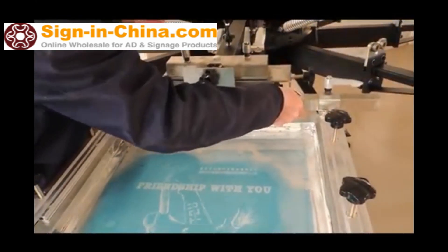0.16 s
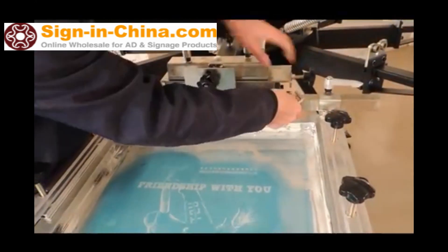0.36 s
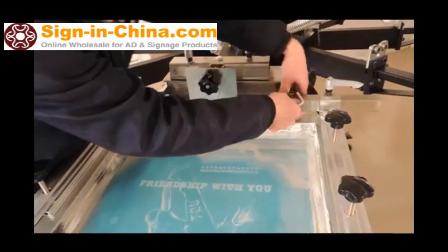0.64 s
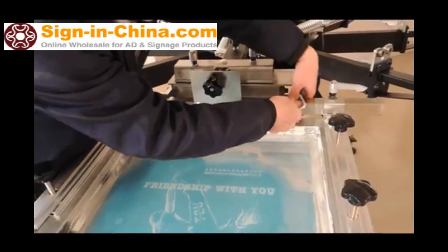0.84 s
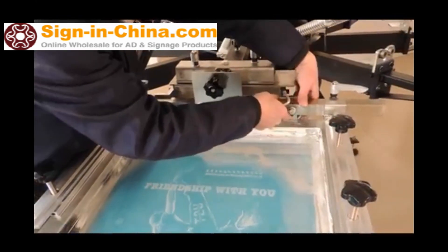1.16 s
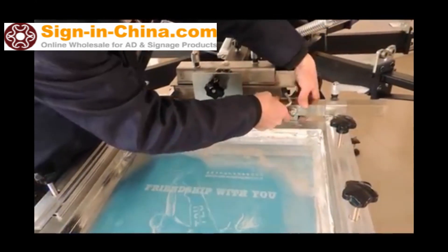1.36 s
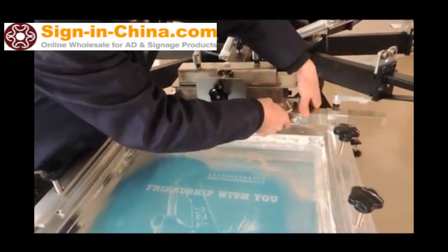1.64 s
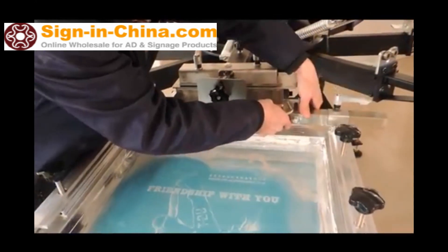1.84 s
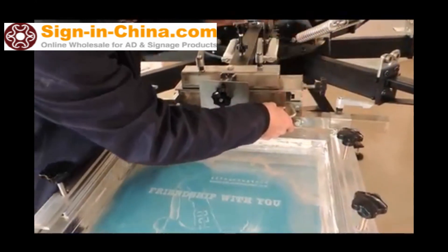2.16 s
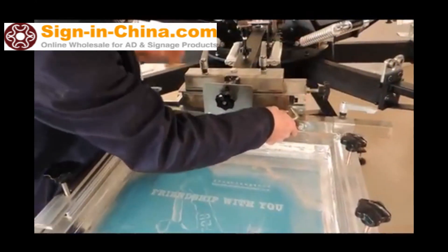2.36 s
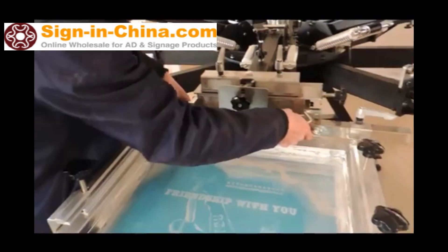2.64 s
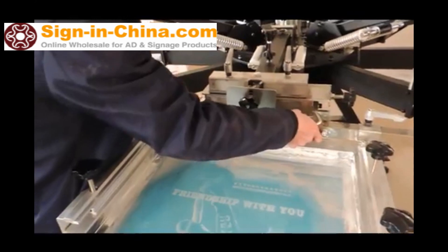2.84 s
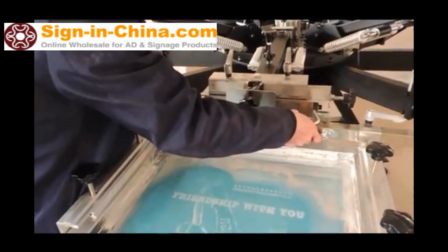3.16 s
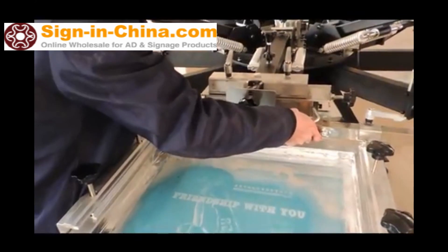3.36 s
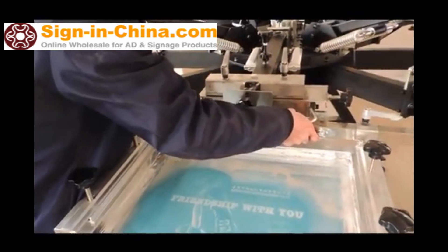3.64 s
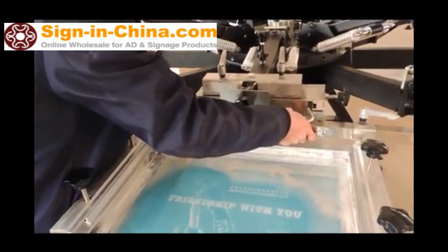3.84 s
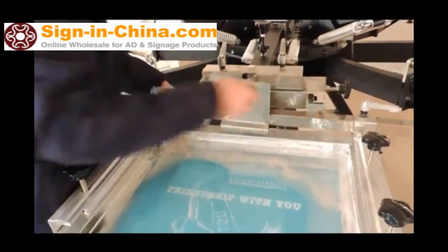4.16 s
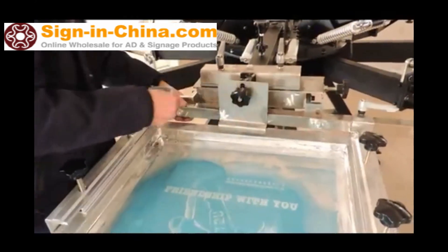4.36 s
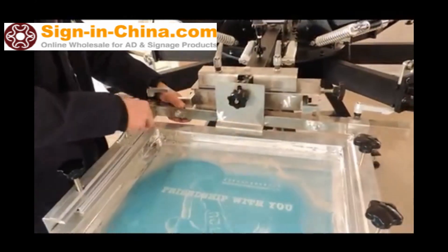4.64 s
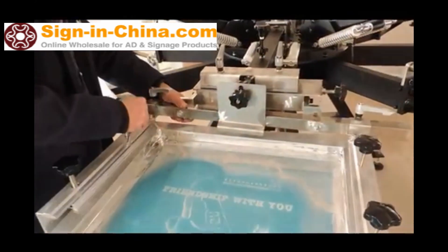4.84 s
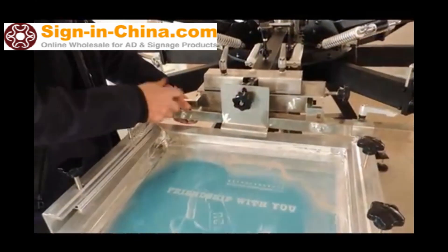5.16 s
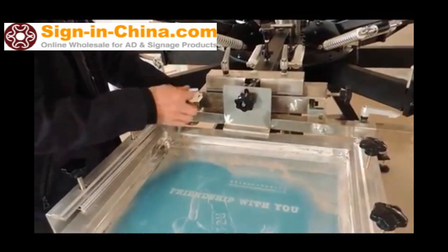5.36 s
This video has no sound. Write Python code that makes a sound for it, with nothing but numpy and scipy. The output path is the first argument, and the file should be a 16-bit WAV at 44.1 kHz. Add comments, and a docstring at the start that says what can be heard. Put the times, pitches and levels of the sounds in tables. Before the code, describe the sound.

After more than a second of near quiet, loose heavy metal rattles rapidly and bangs home, ringing into a workshop. Dull nudges and a thin squeak lead to double knocks and clacks with a low metallic hum. A pause holds low sway and faint fabric rustle, then sharp knocks and a short scrape return. Close microphone, treble slightly dulled.

```python
"""Low room noise, a swaying press arm and a rustling sleeve come first, in a workshop with a manual press.
Near 1.6 s a screen frame judders into its steel holder, metal slides and a clamp lever clacks; more sway follows.
Soft low blows lead to two squeaks near 2.9 s, hard knocks from 3.1 s, sway and rustle near 4 s, then a last bout.
Blows are short noise bursts plus ringing modes, slides are dense tiny slips, squeaks are wavering tones with
rasp, the sway is a wandering low tone, and cloth and room are shaped noise."""
import sys
import numpy as np
from scipy import signal
from scipy.fft import rfft, irfft
from scipy.io import wavfile
from scipy.ndimage import uniform_filter1d

SR = 44100
rng = np.random.default_rng(int(sys.argv[2]) if len(sys.argv) > 2 else 0)


def transcribe(u):
    """Save the signal u as a 16-bit wav file named by the first command-line argument.

    u: samples, shape (n,) or (channels, n), limited to [-1, 1]; the rate is SR.
    q: integer samples, one column per channel.
    """
    v = np.clip(np.atleast_2d(u).T, -1, 1)
    q = np.round(v * 32767).astype(np.int16)
    wavfile.write(sys.argv[1], SR, q)


N = 242550

# All levels are relative, ahead of the gain control. A t60 is the time in which a sound fades by 60 dB.

# Low room noise. Each row: frequency in Hz, level in dB per Hz.
ROOM_COLOUR = [(12, -28), (20, 0.5), (43, -3.5), (59, -6.5), (129, -6.5), (156, -8), (305, -8.5),
               (346, -11), (393, -11.5), (585, -16), (636, -16.5), (768, -17), (3000, -28.5), (3900, -54),
               (6600, -120)]
# Swells of the low rumble. Each row: peak time in seconds, half length in seconds, level in dB.
RUMBLES = [(0, 0.081, -39.5), (4.1, 0.44, -50.5), (5.2, 0.42, -41.5)]
# Sound of the sleeve cloth. Each row: frequency in Hz, level in dB per Hz.
SLEEVE_COLOUR = [(710, -28.5), (1200, -3), (2440, -7.5), (2970, -3), (4510, -4), (11100, -6.5), (12300, -8),
                 (16000, -39), (22000, -120)]
# Strokes of the sleeve. Each row: peak time in seconds, half length in seconds, level in dB.
SLEEVE_STROKES = [(.5, 0.4, -50.5), (1.2, 0.061, -50), (1.37, 0.19, -55.5), (3.9, 1.7, -56),
                  (4.26, 0.068, -47.5), (5.5, 0.14, -38.5)]
SLEEVE_REST_DB, ROOM_NOISE_DB = -58, -46.5

# Swaying of the press arm. Each row: time of the widest swing in seconds, level in dB.
SWAYS = [(.08, -44.5), (1.74, -36), (3.88, -35.5), (5.25, -43)]
SWAY_HZ, SWAY_BUILD_DB_PER_S, SWAY_FADE_DB_PER_S = 35.2, 70, 39

# Frame knocks. Each row: start in seconds, strength in dB, weight of the lows in dB, brightness in dB,
# basic t60 of the contact rattle in seconds.
KNOCKS = [ (1.319, -42, 0.5, -9, 0.024), (1.424, -35, -13, -32, 0.095), (1.582, -43.5, -16, 4.5, .046),
          (1.819, -12, -10.5, -14.5, 0.065), (3.139, -7.5, -9, -7, 0.17), (3.171, -9.5, -11, -15, 0.53),
          (3.547, -14.5, -3, -14.5, 0.087), (3.575, -6, -8.5, -22, 0.082), (3.587, -10, -8, -13.5, .2),
          (3.617, -11, -10.5, -19.5, 0.13), (3.708, -11, -7.5, -14.5, .093),
          (3.73, -11.5, -12, -14.5, 0.14), (4.212, -27.5, -14, -18, 0.13), (4.9965, -1.5, -6, -9.5, .079),
          (5.042, -9, -10.5, -7, 0.13), (5.112, -11, -11, -27, 0.12), (5.292, -26, -15, -21, 0.08),
          (5.481, -26, -12, -24, .066)]
# Boom is deep bass against the lows; the rise time is a share of the basic t60.
KNOCK_BOOM_DB, KNOCK_RISE_SHARE = -3.5, 0.025
# The judder is a run of evenly spaced knocks.
JUDDER_PEAK_S, JUDDER_GAP_S, JUDDER_DB = 1.647, 0.0182, 10
# The build is per contact before the hardest, the loss per squared count of contacts after it.
JUDDER_BUILD_DB, JUDDER_LOSS_DB = 17.5, 0.54
JUDDER_WEIGHT_DB, JUDDER_BRIGHT_DB, JUDDER_T60_S = -6.5, -16.5, 0.083
# Soft, boomy nudges of the frame; the long row at 3.469 s is the lingering low ring after the clack
# at 3.32 s. Each row: start in seconds, strength in dB, weight of the lows in dB, basic t60 in seconds.
SOFT_LOWS = [(2.344, -40.5, -0.5, 0.027), (2.494, -20, -17, 0.11), (2.915, -19, -15.5, 0.094),
             (3.469, -23, -14, 0.47), (4.905, -16.5, -10.5, 0.2)]
SOFT_BOOM_DB, SOFT_BRIGHT_DB, SOFT_RISE_S = 9.5, -21, 0.01
# A firm blow seats the frame, which weakens the after-ring dB for dB up to a limit.
AFTER_RING_DB, FIRM_DB, MOST_DAMPING_DB = 1.5, -8.5, 12.5
# Sound of contact on the frame. Each row: frequency in Hz, level in dB per band.
FRAME_COLOUR = [(40, -28), (58, -34.5), (80, -4), (120, -1.5), (170, -3.5), (225, -14), (310, 1.5),
                (420, -2.5), (600, -1.5), (850, -6), (1100, -16), (1400, -9), (1800, -13), (2300, -10.5),
                (3300, -10.5), (4500, -2.5), (8000, 1.5), (12000, -1.5)]
# Long modes (natural ringing tones) of the frame and press arm. Each row: frequency in Hz, level in dB.
FRAME_MODES = [(97, -3), (178, -7.5), (284, -3), (308, -6.5), (333, -5.5), (388, 1), (544, -3),
               (625, -14.5), (685, -7.5), (822, -14), (962, -7.5), (1270, -15.5), (1430, -12)]

# Clamp lever clacks. Each row: start in seconds, strength in dB, brightness in dB.
CLACKS = [(1.744, 0, -7), (2.826, -28, -1), (3.0946, -9, -12), (3.32, -10.5, -9.5), (3.778, -13, -17),
          (4.691, -22.5, -18), (4.986, -17, -22), (5.166, -19, -11), (5.341, -22, -18)]
CLACK_WEIGHT_DB, CLACK_BOOM_DB, CLACK_RISE_S, CLACK_T60_S = -11, -7.5, 0.0026, 0.03
# Sound of contact on the clamp. Each row: frequency in Hz, level in dB per band.
CLAMP_COLOUR = [(50, -15), (110, -2.5), (300, -4.5), (900, -12.5), (1400, -11.5), (2000, -13.5),
                (2700, -13.5), (3400, -11), (4800, -16.5), (7500, -6), (12000, -16.5)]
# Short modes of the steel clamp. Each row: frequency in Hz, level in dB.
CLAMP_MODES = [(1310, 3), (1430, 2.5), (1690, -18.5), (2360, -18), (2720, -0.5), (3450, 3), (3660, -11.5),
               (6150, -9.5), (7150, -9), (8310, -27)]

# Metal sliding on metal. Each row: start in seconds, length of the push in seconds, level in dB.
SLIDES = [(1.651, 0.03, -7), (1.723, 0.0095, -5.5), (2.478, 0.021, -39), (2.827, 0.016, -36.5),
          (2.89, 0.045, -26.5), (3.086, 0.011, -22), (3.133, 0.048, -20), (3.375, 0.018, -31),
          (4.92, 0.063, -34.5), (4.986, 0.013, -36), (5.005, 0.041, -17.5), (5.42, .07, -48)]
SLIDE_FADE_SHARE = 0.73  # time constant of the dying slide, as a share of the push length
# Sound of the slips. Each row: frequency in Hz, level in dB per Hz.
SLIDE_COLOUR = [(530, -31), (900, -8), (1120, -17), (1380, 3), (1770, -14), (1980, -1), (2330, -5),
                (3890, -7), (5060, -4), (7180, -6), (12300, -11), (16000, -42.5), (22000, -120)]
# High modes of the steel jaws, brought out by sliding. Each row: frequency in Hz, level in dB.
JAW_MODES = [(2030, -13), (3050, 6.5), (3800, -1), (5900, 1.5), (7150, 1), (8450, -6), (10900, -12.5),
             (11250, -7)]

# Squeaks of the clamp. Each row: peak time in seconds, half length in seconds, level in dB.
SQUEAKS = [(2.836, 0.0108, -37.5), (2.925, 0.021, -20.5)]
# Overtones of the squeak. Each row: multiple of its pitch, level in dB.
SQUEAK_PARTIALS = [(1, 6.5), (2, -12), (3, -6.5)]
# Rasping resonances of the squeaking joint. Each row: frequency in Hz, level in dB per Hz.
RASP_COLOUR = [(3300, -25), (4130, -3), (4550, -24), (4970, -1), (5600, -17), (6940, 4), (7600, -7),
               (8350, 0), (9500, -9), (12000, -31)]
SQUEAK_HZ, SQUEAK_SAG_HZ = 2780, 100.2  # pitch at a light touch; drop at the hardest pressure

# Fading of the workshop's reflections. Each row: frequency in Hz, t60 in seconds.
ROOM_T60 = [(80, 0.98), (300, 0.63), (1400, 0.69), (4000, 0.49), (11000, 0.3)]
# Left-right likeness of near sound. Each row: frequency in Hz, correlation from -1 to 1.
NEAR_LIKENESS = [(300, 1), (800, 0.99), (1500, 0.78), (3000, 0.33), (5500, -0.33), (10000, -0.088)]
# Left-right likeness of diffuse sound. Each row: frequency in Hz, correlation from -1 to 1.
FAR_LIKENESS = [(300, 0.97), (750, 0.83), (1400, 0.62), (2800, 0.094), (5500, -0.0024), (10000, -0.16)]

LIMIT_DB, RECOVERY_DB_PER_S, CUTOFF_HZ = -8, 9.5, 12400  # gain control, then the steep treble cut

# Neighbouring frequency bands, used to build dense ringing.
EDGES = np.geomspace(35, 14000, 27)
CENTRES = np.sqrt(EDGES[1:] * EDGES[:-1])
BANK = [signal.butter(2, pair, "band", fs=SR, output="sos") for pair in zip(EDGES, EDGES[1:])]
TIME = np.arange(N) / SR


def from_db(db):
    """Turn decibels into an amplitude factor."""
    return 10 ** (np.asarray(db) / 20)


def rms_one(x):
    """Scale a signal to an average (rms) level of 1."""
    return x / np.sqrt(np.mean(x ** 2) + 1e-20)


def at_hz(points, hz):
    """Read a table between its rows on a log-frequency axis."""
    f, value = np.transpose(points)
    return np.interp(np.log(hz + 1e-9), np.log(f), value)


def drift(rate, size):
    """Random curve around 0 that takes a new direction rate times a second."""
    knots = rng.standard_normal(size // 8)
    return np.interp(np.arange(size) / SR * rate, np.arange(len(knots)), knots)


def swells(rows):
    """Smooth bell-shaped swells, added in power."""
    power = 0
    for s, half, db in rows:
        distance = np.minimum(((TIME - s) / half) ** 2, 20)
        power = power + from_db(db) ** 2 * np.exp(-2 * distance)
    return np.sqrt(power)


def stereo(pair, likeness):
    """Mix two unrelated signals into left and right with a given correlation."""
    c = np.clip(likeness, -0.999, 0.999)
    shared = np.sqrt((1 + c) / 2) * pair[0]
    opposed = np.sqrt((1 - c) / 2) * pair[1]
    return shared + opposed * np.array([[1], [-1]])


def noise(colour, size):
    """Diffuse stereo noise of a given spectrum, rms 1."""
    hz = np.fft.rfftfreq(size, 1 / SR)
    bins = stereo(rfft(rng.standard_normal((2, size))), at_hz(FAR_LIKENESS, hz))
    return rms_one(irfft(bins * from_db(at_hz(colour, hz)), size))


def background(rustle_db):
    """Cloth rubbing in strokes is noise with swells, over the swelling low noise of the room."""
    rubbing = np.hypot(from_db(SLEEVE_REST_DB), swells(SLEEVE_STROKES))
    grain = from_db(rustle_db * drift(90, size=N))
    sleeve = rubbing * grain * noise(SLEEVE_COLOUR, size=N)
    rumble = np.hypot(from_db(ROOM_NOISE_DB), swells(RUMBLES))
    return sleeve + rumble * noise(ROOM_COLOUR, size=N)


def sway(wander):
    """The heavy arm swings at its lowest mode, with a wandering pitch."""
    hz = SWAY_HZ * (1 + wander * drift(12, size=N))
    phase = 2 * np.pi * np.cumsum(hz) / SR
    swing = 0
    for s, db in SWAYS:
        loss_db = np.maximum(SWAY_BUILD_DB_PER_S * (s - TIME), SWAY_FADE_DB_PER_S * (TIME - s))
        swing = swing + from_db(db - loss_db)
    return swing * rms_one(np.sin(phase))


def contact(s, db, weight_db, boom_db, bright_db, rise, t60):
    """One blow: start, middle, boom, thud, treble, rise, t60, after-ring; firm blows ring on less."""
    after_db = AFTER_RING_DB - np.clip(db - FIRM_DB, 0, MOST_DAMPING_DB)
    thud_db = db + weight_db
    return s, db, thud_db + boom_db, thud_db, db + bright_db, rise, t60, after_db


def judder(before_count, count):
    """Knocks of the frame dropping into its holder build to the hardest, then weaken ever faster."""
    k = np.arange(count) - before_count
    db = JUDDER_DB + JUDDER_BUILD_DB * np.minimum(k, 0) - JUDDER_LOSS_DB * np.maximum(k, 0) ** 2
    times = JUDDER_PEAK_S + JUDDER_GAP_S * k
    return [(s, level, JUDDER_WEIGHT_DB, JUDDER_BRIGHT_DB, JUDDER_T60_S) for s, level in zip(times, db)]


def frame_contacts():
    """Hard judder and knocks rise fast; soft nudges and one lingering low ring rise slower, with more boom."""
    hard = [contact(s, db, weight, KNOCK_BOOM_DB, bright, KNOCK_RISE_SHARE * t60, t60)
            for s, db, weight, bright, t60 in judder(before_count=2, count=8) + list(KNOCKS)]
    soft = [contact(s, db, weight, SOFT_BOOM_DB, SOFT_BRIGHT_DB, SOFT_RISE_S, t60)
            for s, db, weight, t60 in SOFT_LOWS]
    return hard + soft


def dense_ring(band_db, band_t60, likeness, grip):
    """Countless close modes, fed by grip and dying band by band; band_db is each band's energy."""
    t, out = np.arange(len(grip)) / SR, 0
    for sos, hz, db, t60 in zip(BANK, CENTRES, band_db, band_t60):
        dying = rng.standard_normal((2, len(t))) * grip * from_db(-60 * t / t60)
        band = signal.sosfilt(sos, stereo(dying, at_hz(likeness, hz)) + 1e-18)
        out = out + from_db(db) * rms_one(band) / np.sqrt(len(t))
    return out


def add(track, s, sound):
    """Lay a sound on a track at a time in seconds."""
    at = max(round(s * SR), 0)
    track[:, at:at + sound.shape[1]] += sound[:, :N - at]


def blows(rows, colour, gain_db, chatter_db, bass_linger, spot_db):
    """Loose metal parts meet in a quick uneven chatter; gives the near sound and its share that rings on."""
    near, onward = np.zeros((2, 2, N))
    age = TIME[:SR // 4]
    for s, middle_db, boom_db, thud_db, treble_db, rise, t60, after_db in rows:
        tilt = [(150, boom_db), (260, thud_db), (600, thud_db),
                (1200, middle_db), (3400, middle_db), (5500, treble_db)]
        # each point of contact favours its own upper resonances
        spot = spot_db * rng.uniform(-1.88, 1, len(CENTRES)) * CENTRES / (CENTRES + 500)
        force = at_hz(tilt, CENTRES) + spot
        # the low bands die last
        band_t60 = max(t60, 0.008) + bass_linger * 200 / (200 + CENTRES)
        chatter = from_db(chatter_db * drift(450, size=len(age)))
        grip = (1 - np.exp(-age / max(rise, 1e-4))) * chatter
        blow = dense_ring(force + at_hz(colour, CENTRES) + gain_db, band_t60, NEAR_LIKENESS, grip)
        add(near, s, blow)
        add(onward, s, blow * from_db(after_db))
    return near, onward


def struck(times, force_db, modes, t60):
    """Each blow rings every mode with its own strength; high modes differ more from left to right."""
    out, top_db = np.zeros((2, N)), np.max(np.array(modes)[:, 1])
    for hz, db in modes:
        pattern = stereo(rng.choice([-1, 1], (len(times), 2)).T, at_hz(NEAR_LIKENESS, hz))
        strength = from_db(force_db + db - top_db) * rng.uniform(0.37, 1.22, len(times))
        clicks = np.zeros((2, N))
        clicks[:, (times * SR).astype(int)] = pattern * strength
        # a two-step filter rings at hz and shrinks by r every sample
        r, w = from_db(-60 / (t60 * SR)), 2 * np.pi * hz / SR
        out += signal.lfilter([0, np.sin(w)], [1, -2 * r * np.cos(w), r * r], clicks + 1e-18)
    return out


def frame_ring(rows, gain_db, t60):
    """The thud of each blow leaves the frame humming, more weakly if the blow was firm."""
    s, _, _, thud_db, _, _, _, after_db = np.transpose(rows)
    return struck(s, thud_db + 2 * after_db + gain_db, FRAME_MODES, t60)


def clamp_ring(rows, gain_db, t60):
    """The middle part of each blow's force makes the clamp clink."""
    s, middle_db = np.transpose(rows)[:2]
    return struck(s, middle_db + gain_db, CLAMP_MODES, t60)


def convolve(x, response):
    """Let every sample of x set off the response."""
    return signal.fftconvolve(x, response, axes=-1)[:, :N]


def workshop(x, build_s):
    """Reflections build up within milliseconds and, broadly, die sooner in the treble."""
    grip = 1 - np.exp(-(TIME[:SR] / build_s) ** 2)
    flat_db = 10 * np.log10(np.diff(EDGES) / (SR / 2))  # wider bands hold more energy
    return convolve(x, dense_ring(flat_db, at_hz(ROOM_T60, CENTRES), FAR_LIKENESS, grip))


def slides(slips_per_s, ring_s, judder_db, sing_db, sing_t60):
    """Dense tiny slips excite the bright, short ring of the steel jaws and a few modes that sing longer."""
    pressure = np.zeros(N)
    for s, push, db in SLIDES:
        age = TIME - s
        rising = np.sqrt(np.clip(age / push, 0, 1))
        dying = np.exp(-np.maximum(age - push, 0) / (SLIDE_FADE_SHARE * push))
        pressure += from_db(db) * rising * dying
    hits = (rng.random(N) < slips_per_s / SR) * rng.standard_normal(N)
    slips = rms_one(hits * from_db(judder_db * drift(200, size=N)))
    rasp = noise(SLIDE_COLOUR, size=4096)
    length = rasp.shape[1]
    short_ring = rms_one(rasp * np.exp(-TIME[:length] / ring_s))
    sing = rms_one(struck(np.zeros(1), 0, JAW_MODES, sing_t60)[:, :length])
    jaws = (short_ring + from_db(sing_db) * sing) / np.sqrt(length)
    return convolve(np.array([slips * pressure] * 2), jaws)


def clamp_contacts():
    """The lever's clacks are quick, short blows on the clamp."""
    return [contact(s, db, CLACK_WEIGHT_DB, CLACK_BOOM_DB, bright, CLACK_RISE_S, CLACK_T60_S)
            for s, db, bright in CLACKS]


def squeak(jitter, flutter_db, rasp_db):
    """Stick and slip lock on to one clamp mode, unsteady in pitch and strength, and rasp in higher ones."""
    pressure = swells(SQUEAKS)
    hz = SQUEAK_HZ - SQUEAK_SAG_HZ * np.sqrt(pressure / pressure.max())
    phase = 2 * np.pi * np.cumsum(hz * (1 + jitter * drift(1100, size=N))) / SR
    tone = sum(from_db(level) * np.sin(round(k) * phase) for k, level in SQUEAK_PARTIALS)
    voice = rms_one(tone) + from_db(rasp_db) * noise(RASP_COLOUR, size=N)
    flutter = from_db(flutter_db * drift(400, size=N))
    return voice * pressure * flutter * from_db([[-1], [1]])  # a little louder on the right


def gain_control(x):
    """The gain drops at once when the level passes the limit and creeps back up."""
    power = uniform_filter1d(np.mean(x ** 2, axis=0), size=882)  # averaged over 20 ms
    level_db = 10 * np.log10(np.abs(power) + 1e-12)
    recovery = RECOVERY_DB_PER_S * TIME
    excess_db = np.maximum(level_db - LIMIT_DB, 0)
    return x * from_db(recovery - np.maximum.accumulate(excess_db + recovery))


def scene():
    """Mix the near sounds with separate reflections for the frame, the clamp and the rubbing metal."""
    backdrop = background(rustle_db=0.06)
    arm = sway(wander=0.0783)
    knocks, clacks = frame_contacts(), clamp_contacts()
    frame, frame_onward = blows(knocks, FRAME_COLOUR, gain_db=19.0, chatter_db=3.5,
                                bass_linger=0.042, spot_db=3.0)
    hum = frame_ring(knocks, gain_db=-9.5, t60=0.73)
    clinks = clamp_ring(knocks, gain_db=-11.5, t60=0.049) + clamp_ring(clacks, gain_db=-3, t60=0.014)
    rubbing = slides(slips_per_s=3000, ring_s=0.0044, judder_db=-1.0, sing_db=-6.0, sing_t60=0.043)
    clamp, clamp_onward = blows(clacks, CLAMP_COLOUR, gain_db=22.0, chatter_db=2.5,
                                bass_linger=0.049, spot_db=4.5)
    squeal = squeak(jitter=0.0206, flutter_db=5.0, rasp_db=-5.0)
    room = from_db(-4.0) * workshop(frame_onward, build_s=0.0075)
    room += from_db(-1.5) * workshop(clamp_onward + from_db(-9.5) * clinks, build_s=0.0032)
    room += from_db(-6.5) * workshop(rubbing + from_db(-6.5) * squeal, build_s=0.007)
    return backdrop + arm + frame + hum + clinks + rubbing + clamp + squeal + room


def record(dry):
    """Loud stretches turn the gain down, peaks past 0.97 are clipped, and the top is cut steeply."""
    clipped = np.clip(gain_control(dry), -0.97, 0.97)
    treble_cut = signal.ellip(12, 0.1, 70, CUTOFF_HZ, fs=SR, output="sos")
    return signal.sosfilt(treble_cut, clipped)


dry = scene()
out = record(dry)
transcribe(out)
```